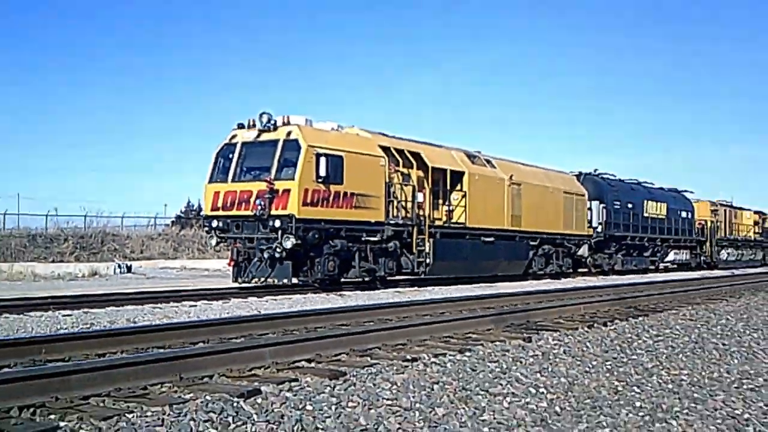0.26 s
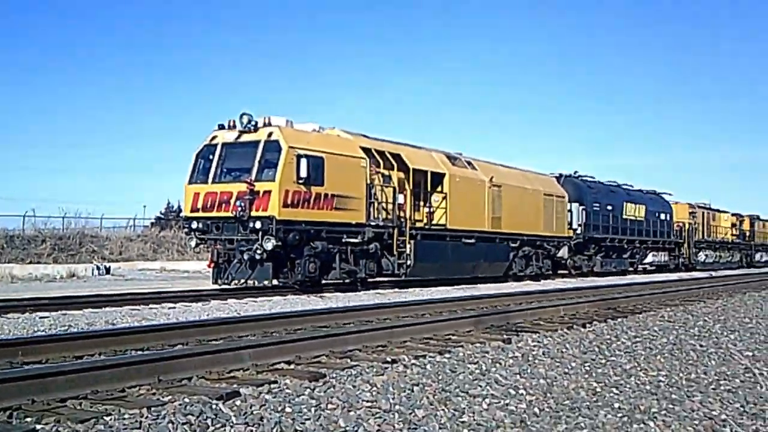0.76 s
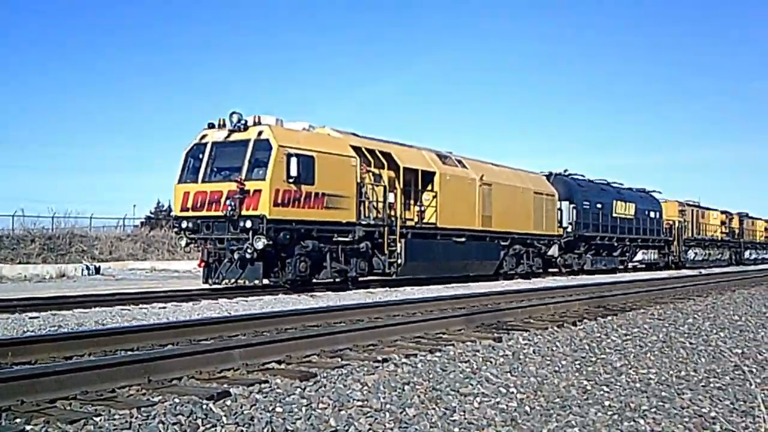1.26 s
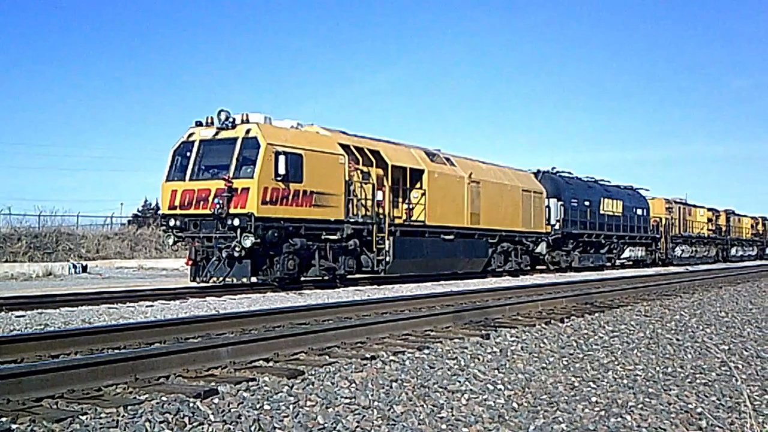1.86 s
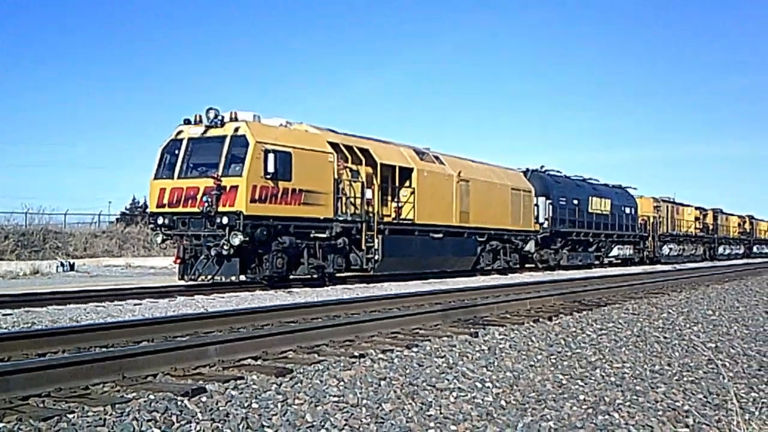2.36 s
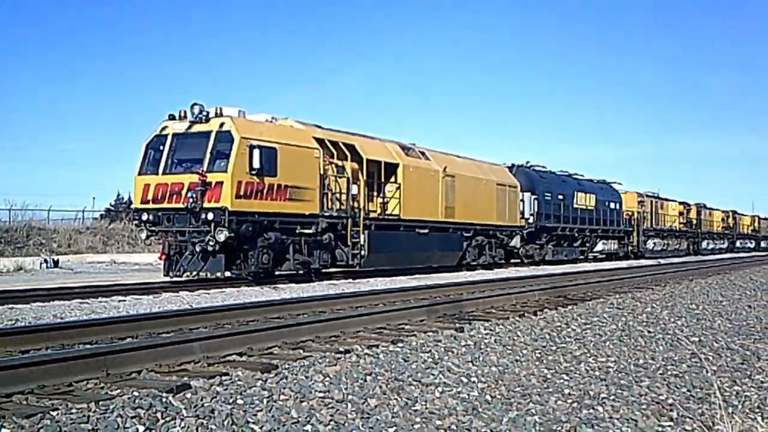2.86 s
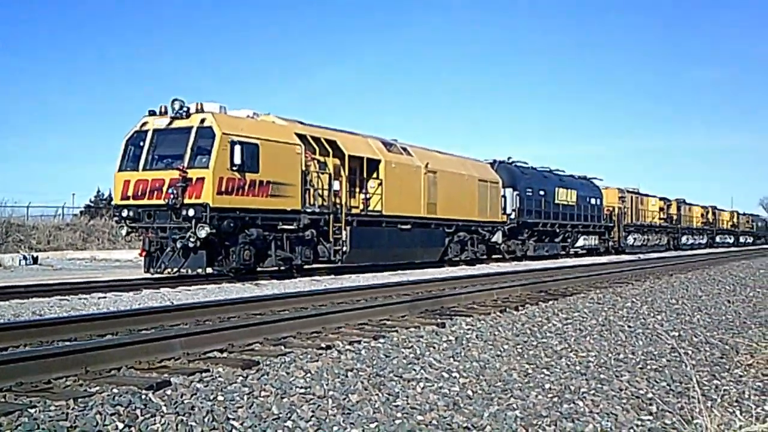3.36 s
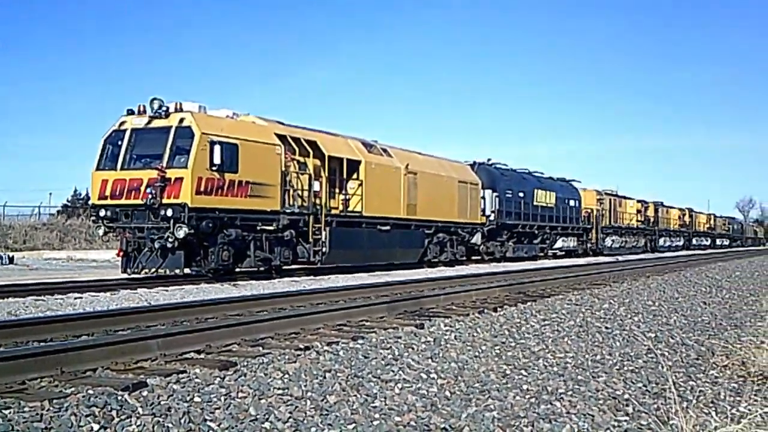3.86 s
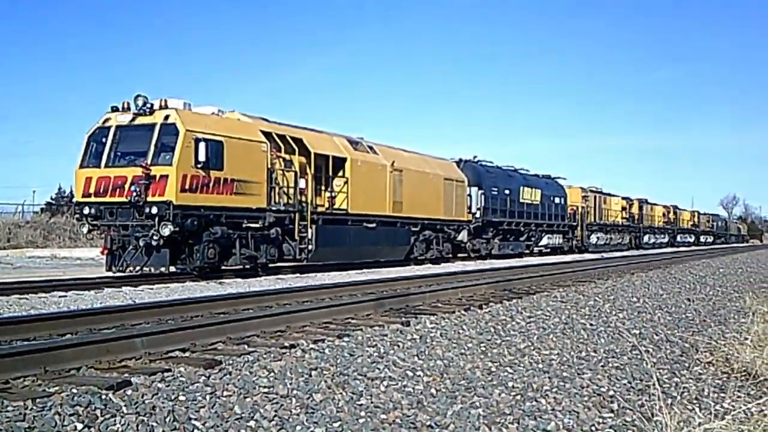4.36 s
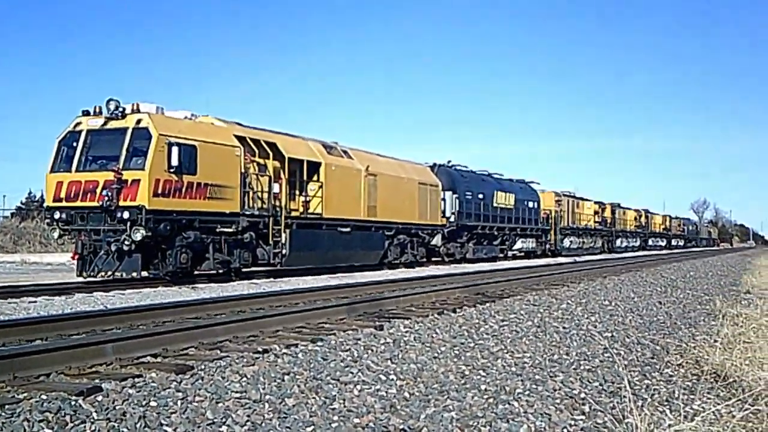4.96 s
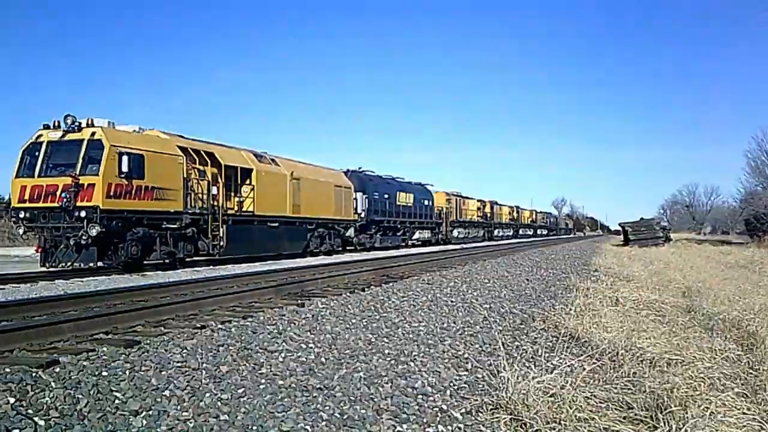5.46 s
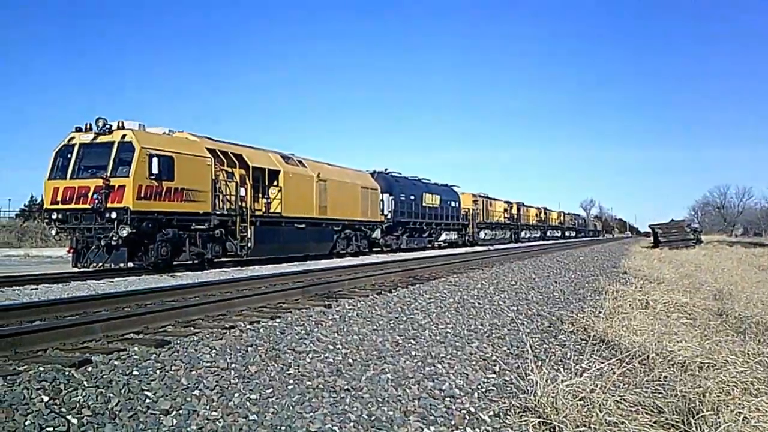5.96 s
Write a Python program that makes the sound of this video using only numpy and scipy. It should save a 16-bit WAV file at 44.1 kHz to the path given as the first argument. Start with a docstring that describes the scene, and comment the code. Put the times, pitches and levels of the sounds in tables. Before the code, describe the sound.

Steady outdoor drone of an idling rail machine: low throbbing engine, singing hydraulic pump and broad fan rush, wind thumping lightly, one tiny click late.

```python
"""A diesel maintenance train idles on a siding, heard from across the tracks in light wind.
The engine, at 1800 rpm, hums in sines on its shaft orders and clatters in a rattle repeated every two turns.
A hydraulic pump sings a stack of harmonics; fans and exhaust roar beneath as shaped noise.
Steady tones and a faint sliding hum join in, and wind lumps and eddies push and tug at the microphone.
A small camera samples it at 16 kHz: a mirror copy leaks in above 8 kHz, and the stream skips once."""
import sys
import numpy as np
from scipy import signal
from scipy.fft import rfft, irfft
from scipy.io import wavfile
from scipy.ndimage import uniform_filter1d

SR = 44100
rng = np.random.default_rng(int(sys.argv[2]) if len(sys.argv) > 2 else 0)


def materialize(psi):
    """Save the field psi as 16-bit PCM at rate SR to the path in sys.argv[1].

    A 1-D psi becomes a single channel; in a 2-D psi each row is a channel.
    """
    bounded = np.clip(np.atleast_2d(psi).T, -1, 1)
    quanta = np.round(bounded * 32767).astype(np.int16)
    wavfile.write(sys.argv[1], SR, quanta)


N = 273411
T = np.arange(N) / SR
SHAFT_HZ = 30.0
CAMERA_HZ = 16000  # sampling rate of the small camera
# the stream skips once and the waveform jumps: start_s, step_db
STREAM_SKIP = (5.3152, -29)


def gain_of(db):
    """Turns dB into an amplitude gain."""
    return 10 ** (np.asarray(db) / 20)


def evened(x):
    """Scales to rms 1."""
    return x / np.sqrt(np.mean(x ** 2) + 1e-20)


def read(points, hz):
    """Reads a spectrum table, its points joined on a log-frequency axis."""
    f, value = np.transpose(points)
    return np.interp(np.log(hz + 1), np.log(f + 1), value)


def curve(rows, axis):
    """Joins one column of a timed table into a value for every sample."""
    rows = np.array(rows)
    return np.interp(T, rows[:, 0], rows[:, axis])


def drift(top_hz):
    """Slow chance of rms 1: sines of random phase from 0.2 Hz up to top_hz, weaker as they quicken."""
    t = T[::64]
    slow = np.zeros(len(t))
    for f in np.geomspace(.2, top_hz, num=20):
        slow += np.sin(2 * np.pi * (f * t + rng.random())) / np.sqrt(f)
    return np.interp(T, t, evened(slow))


def hum(base_hz, orders, unsteady, waver_db):
    """Sines locked to one shaft whose speed hunts a little; each one's level wavers a little by chance."""
    speed_hz = base_hz * (1 + unsteady * drift(2.913))
    turns = np.cumsum(speed_hz) / SR
    total = np.zeros(N)
    for order, level_db in orders:
        # higher orders waver more
        wavering_db = level_db + waver_db * np.sqrt(order) * drift(8)
        sine = np.sin(2 * np.pi * (order * turns + rng.random()))
        total += np.sqrt(2) * gain_of(wavering_db) * sine
    return total


def wind():
    """Slow lumps of air pressure on the microphone: low-passed noise, swelling by chance."""
    breeze_db, gusty_db = -38, 2.0  # middle level and rms of the swelling
    # relative spectrum of the buffeting: freq_hz, density_db (per Hz)
    buffet = [(1, -4), (5, 0.5), (20, 0.5), (27, -21.5), (40, -34.5)]
    hz = np.fft.rfftfreq(N, 1 / SR)
    shape = gain_of(read(buffet, hz)) * (hz < buffet[-1][0])
    lumps = irfft(rfft(rng.standard_normal(N)) * shape, N)
    return gain_of(breeze_db + gusty_db * drift(3.3)) * evened(lumps)


def tugs():
    """Each eddy is a short suction; the microphone's vent, a damped high-pass, makes it rebound."""
    half_width_s, vent_hz, vent_damping = .014, 5.5, .8
    # eddies that tug at the microphone: trough_s, depth_db
    eddies = [(0.139, -22), (0.23, -28), (0.34, -28), (0.602, -24.5), (0.748, -29), (0.835, -28.5),
              (1.03, -19.5), (1.217, -27.5), (1.415, -28.5), (1.605, -30), (1.834, -19.5), (2.022, -26),
              (2.221, -27), (2.592, -21.5), (2.64, -29), (2.823, -28.5), (3.204, -26), (3.347, -25.5),
              (3.435, -28.5), (3.541, -28), (3.999, -29), (4.1, -22), (4.43, -29), (4.618, -27.5),
              (4.858, -22.5), (5.04, -27), (5.235, -29), (5.521, -22), (5.89, -29.5)]
    t = np.arange(-.05, .4, 1 / SR)
    w = 2 * np.pi * vent_hz
    vent = signal.bilinear([1, 0, 0], [1, 2 * vent_damping * w, w * w], SR)
    suction = -np.exp(-(t / half_width_s) ** 2)
    tug = signal.lfilter(*vent, suction)
    starts = np.zeros(N)
    for trough_s, depth_db in eddies:
        starts[round(trough_s * SR) - tug.argmin()] = gain_of(depth_db)
    return signal.oaconvolve(starts, tug / -tug.min())[:N]


def colour_db(hz):
    """The fan and exhaust spectrum as casing and ground shape it, within the camera's band."""
    # relative spectrum of fans and exhaust: freq_hz, density_db (per Hz)
    fans_exhaust = [(24, -4.5), (43, 2.5), (80, -7), (130, -5.5), (200, -10.5), (290, -12.5), (450, -11.5),
                    (1000, -11), (1700, -17), (3000, -24), (3600, -33), (4300, -48), (6500, -63),
                    (8000, -54.5)]
    # the casing rings (above 0 dB) or the ground echo cancels (below): centre_hz, width_hz, level_db
    casing = [(536, 100, 4.5), (754, 45, -7.5), (1450, 370, -0.5), (2114, 330, -4), (32, 6.9, -5.5),
              (110, 11, -3.5), (1925, 72, 3), (588, 19, 1.5), (3410, 120, 2), (3780, 110, -1.5),
              (272, 18, -4), (1276, 60, -1.5), (1666, 55, -2), (4360, 120, 5), (6590, 440, -6.5)]
    level_db = read(fans_exhaust, hz)
    for centre_hz, width_hz, bump_db in casing:
        level_db = level_db + bump_db * np.exp(-((hz - centre_hz) / width_hz) ** 2)
    heard = (hz > 20) & (hz < CAMERA_HZ / 2)
    return np.where(heard, level_db, -200)


def roar(patchy_db=.5):
    """Fans and exhaust: random short-time spectra, coloured, with faint drifting patches."""
    # how the roar runs: time_s, level_db (rms), brightness_db (per octave, from 1 to 4 kHz)
    running = [(0, -32.5, 1), (.8, -33, 0.8), (2.2, -33.5, 0.34), (3.5, -33.5, 0.6), (4.8, -33, 0),
               (5.4, -34, 1), (6.2, -34.5, 0.5)]
    frames, hz = N // 2048 + 5, np.fft.rfftfreq(8192, 1 / SR)
    a, b, patches = rng.standard_normal((frames, len(hz), 3)).T
    patches = uniform_filter1d(patches, 80, axis=0)  # across frequency
    patches = evened(uniform_filter1d(patches, size=3, axis=1))  # across time
    frame_at = np.minimum(np.arange(frames) * 2048, N - 1)
    brightness = curve(running, axis=2)[frame_at]
    octaves = np.clip(np.log2(hz / 1000 + 1e-9), 0, 2)[:, None]
    shape_db = colour_db(hz)[:, None] + brightness * octaves + patchy_db * patches
    spectra = (a + 1j * b) * gain_of(shape_db)
    noise = signal.istft(spectra, nperseg=8192, noverlap=6144)[1][:N]
    return gain_of(curve(running, axis=1)) * evened(noise)


def slide():
    """A faint lone sine swells in, falling at a steady rate, and stops at the skip."""
    start_s, start_hz, hz_per_s = 3.5, 234, -6.0
    start_db, full_db, swell_s = -65, -48, 1.1  # rms levels
    skip_s, _ = STREAM_SKIP
    since = T - start_s
    level_db = start_db + (full_db - start_db) * np.clip(since / swell_s, 0, 1)
    turns = start_hz * since + hz_per_s * since ** 2 / 2
    sounding = (since > 0) * (T < skip_s)
    return np.sqrt(2) * gain_of(level_db) * sounding * np.sin(2 * np.pi * turns)


def other_tones():
    """Lone sines off the two shafts' orders, each wavering on its own."""
    # steady tones: pitch_hz, level_db (rms, before the waver)
    steady = [(21.5, -43), (123.8, -57), (2013.3, -59)]
    return sum(hum(pitch_hz, [(1, db)], unsteady=.0003, waver_db=2.0) for pitch_hz, db in steady)


def pump():
    """The hydraulic pump: harmonics of one pulsing rate, rising and falling with its load."""
    # pump harmonics: multiple, level_db (rms, before load and waver)
    harmonics = [(1, -37), (2, -48.5), (3, -42), (4, -49), (5, -42.5), (6, -45.5), (8, -51.5), (9, -56),
                 (11, -64)]
    # the pump's load: time_s, level_db (added to all harmonics)
    load = [(0, 0), (2, 0.5), (4.3, 0.56), (4.9, 0.5), (6.2, -0.5)]
    song = hum(177.24, harmonics, unsteady=.0002, waver_db=.25)
    return gain_of(curve(load, axis=1)) * song


def clatter(level_db=-46, centre_hz=1800, width_hz=900):
    """Valves and injectors repeat one rattle every two turns: a fine comb of half orders."""
    size = round(2 * SR / SHAFT_HZ)
    hz = np.fft.rfftfreq(size, 1 / SR)
    emphasis = 0.22 + np.exp(-((hz - centre_hz) / width_hz) ** 2)
    spectrum = rfft(rng.standard_normal(size)) * gain_of(colour_db(hz)) * emphasis
    rattle = irfft(spectrum, size)
    return gain_of(level_db) * evened(np.resize(rattle, N))  # resize repeats it


def diesel():
    """The engine and its gearing: a hum of sines on the shaft orders, plus the clatter."""
    # diesel and gearing: shaft_order, level_db (rms, before the waver)
    shaft_orders = [(1.5, -46.5), (3, -37.5), (4.5, -60), (8, -46.5), (16, -55), (16.5, -50.5), (18, -49.5),
                    (27, -58), (33, -53), (48.5, -61.5), (58.5, -66.5), (65, -67), (82, -57)]
    return hum(SHAFT_HZ, shaft_orders, unsteady=.0001, waver_db=0.21) + clatter()


def scene():
    """The train across the tracks and the wind at the microphone, as one channel."""
    air = wind() + tugs()
    train = roar() + slide() + other_tones() + pump() + diesel()
    return (air + train)[None]


def record(dry):
    """The camera's sampling mirrors the sound around 8 kHz; one skip; then the band limit."""
    # mirror copy that the playback filter lets through: freq_hz, gain_db
    mirror = [(8000, -2.5), (9500, -0.5), (12000, -19.5), (13000, -25), (14000, -34), (15000, -46),
              (15300, -55.5), (15700, -55)]
    skip_s, step_db = STREAM_SKIP
    hz = np.fft.rfftfreq(N, 1 / SR)
    mirrored = rfft(2 * dry * np.cos(2 * np.pi * CAMERA_HZ * T))
    leak = gain_of(read(mirror, hz)) * (hz > CAMERA_HZ / 2) * (hz < CAMERA_HZ)
    # a downward step that dies away in about a millisecond
    after = np.maximum(T - skip_s, 0)
    jump = -gain_of(step_db) * np.exp(-after / .0005) * (T >= skip_s)
    played = dry + irfft(mirrored * leak, N) + jump
    band_limit = signal.firwin(1023, 15750, window=("kaiser", 9), fs=SR)  # low-pass edge in Hz
    return signal.oaconvolve(played, band_limit[None], "same")


dry = scene()
out = record(dry)
materialize(out)
```